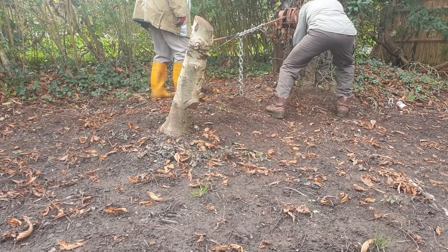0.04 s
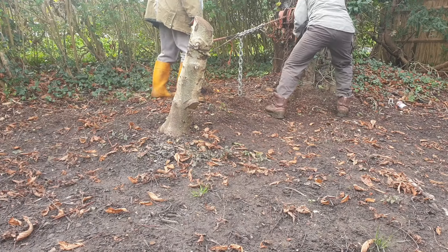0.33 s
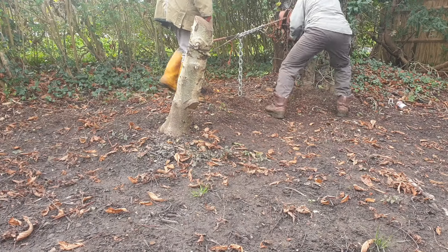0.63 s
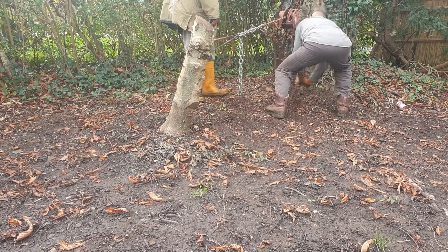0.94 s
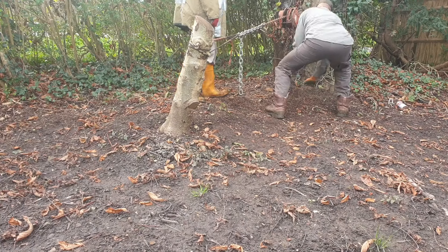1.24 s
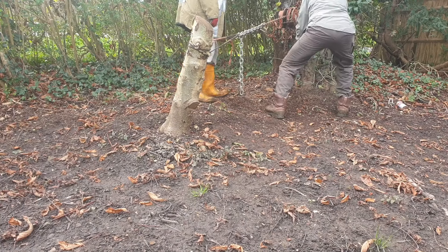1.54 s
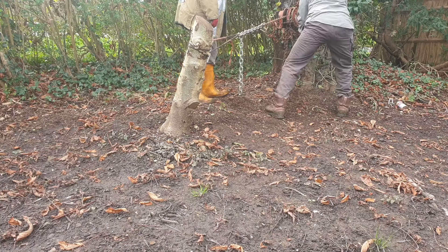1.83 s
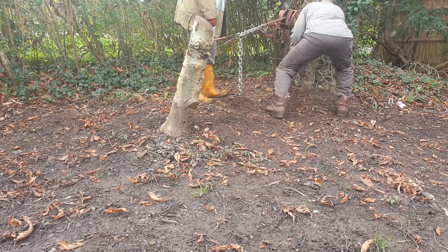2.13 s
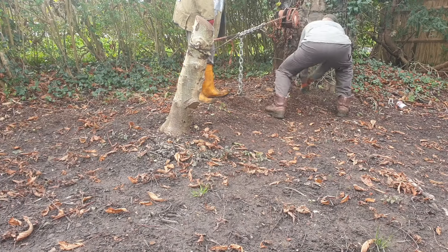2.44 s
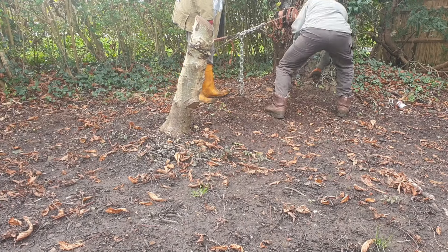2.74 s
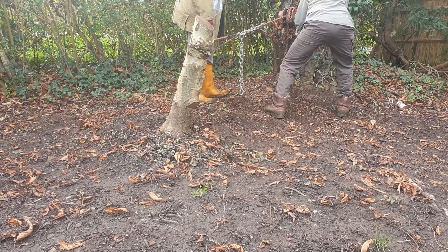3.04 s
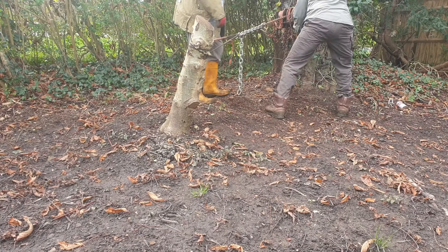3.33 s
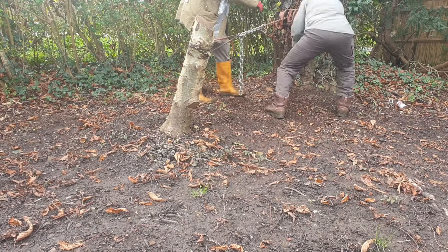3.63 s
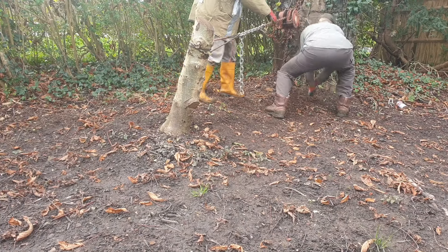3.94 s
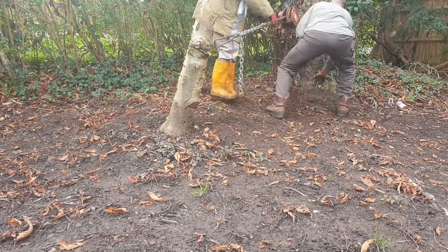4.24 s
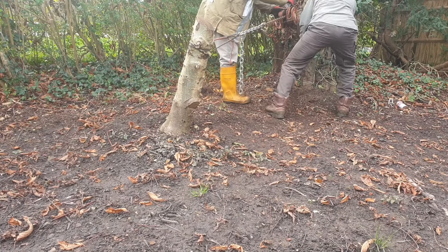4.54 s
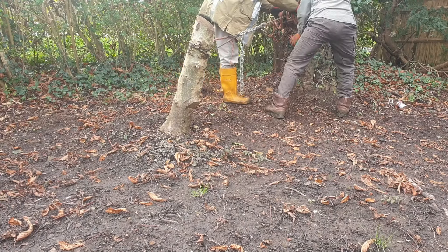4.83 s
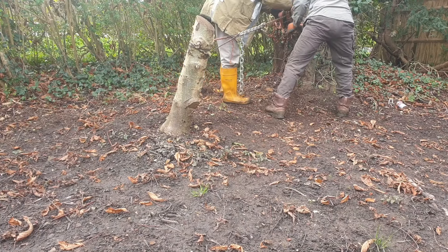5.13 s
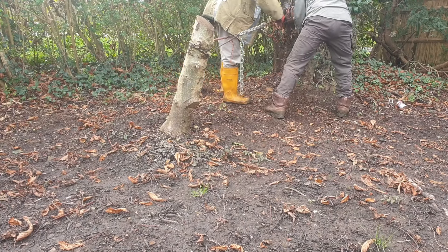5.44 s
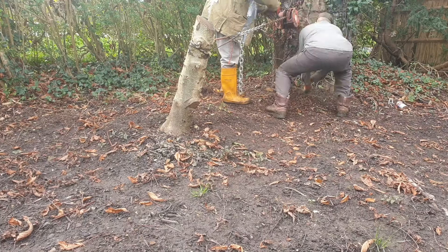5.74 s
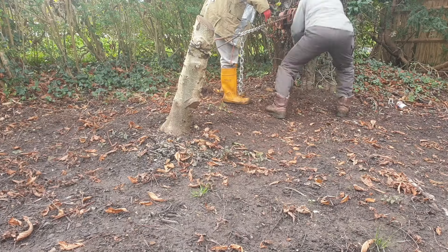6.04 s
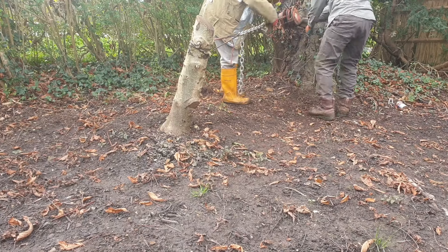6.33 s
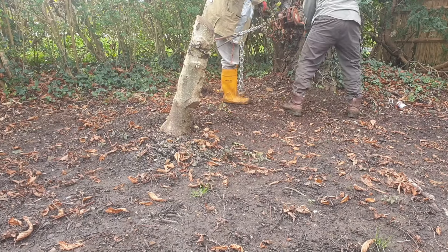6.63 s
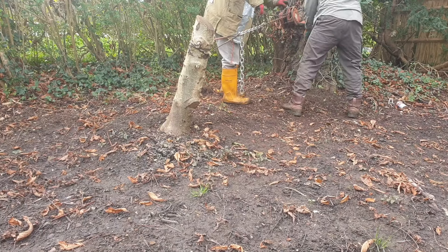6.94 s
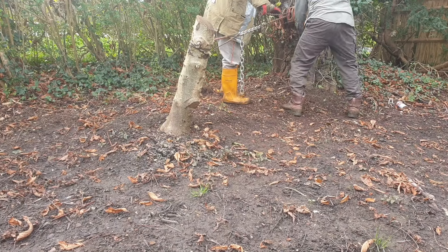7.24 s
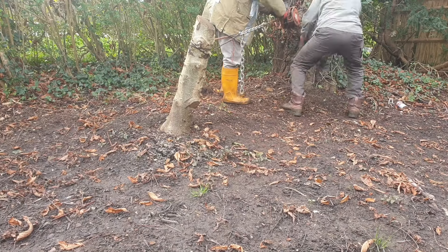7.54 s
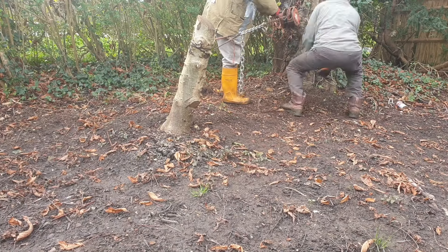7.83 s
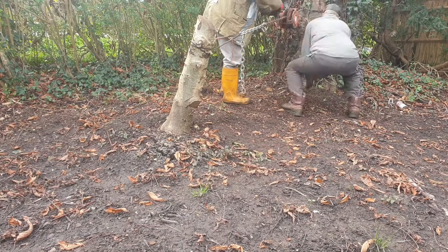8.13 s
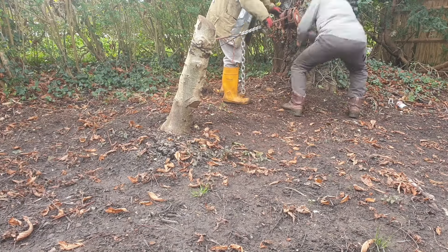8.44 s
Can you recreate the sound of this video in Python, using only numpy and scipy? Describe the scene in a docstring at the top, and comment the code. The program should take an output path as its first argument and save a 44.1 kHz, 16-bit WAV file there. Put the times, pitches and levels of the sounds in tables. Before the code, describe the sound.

A hand chain hoist is worked under load in a garden, a few metres from the microphone. Slack chain clinks and hisses, then three pulls each bring a fast ratchet clatter and chain rattle, with the steel ringing on. Six shorter, more damped tugs follow. Between pulls the housing knocks on its hook, cloth rubs and a heel thuds on soil. A small bird sings faintly over a low distant rumble.

```python
"""A chain block (a hand hoist) is hauled under load in a garden, a few metres away, over a low rumble.
First the slack chain hisses and clinks, the housing knocks on its hook and a small bird sings.
Then come three long pulls: the pawl (a small catch) clatters over the toothed wheel, the hand chain
rattles through the housing, and the steel rings on. From 5.4 s a hand steadies the block, so six short
tugs ring less. Between them cloth rubs, a heel thuds on the soil and the bird twitters."""
import sys
import numpy as np
from scipy import signal
from scipy.fft import rfft, irfft, next_fast_len
from scipy.io import wavfile
from scipy.ndimage import uniform_filter1d

SR = 44100
rng = np.random.default_rng(int(sys.argv[2]) if len(sys.argv) > 2 else 0)


def materialize(psi):
    """Save the field psi as 16-bit PCM at rate SR to the path in sys.argv[1].

    A 1-D psi becomes a single channel; in a 2-D psi each row is a channel.
    """
    bounded = np.clip(np.atleast_2d(psi).T, -1, 1)
    quanta = np.round(bounded * 32767).astype(np.int16)
    wavfile.write(sys.argv[1], SR, quanta)


N = 382347
TIME = np.arange(N) / SR
FFT_SIZE = next_fast_len(N + SR, real=True)
FREQS = np.maximum(np.fft.rfftfreq(FFT_SIZE, 1 / SR), 1)
HAND_ON_S = 5.4   # from here on a hand steadies the block


def from_db(db):
    """Turn decibels into a number to multiply by."""
    return 10 ** (np.asarray(db) / 20)


def rms_one(x):
    """Scale a signal so that its average power is 1."""
    return x / np.sqrt(np.mean(x ** 2) + 1e-20)


def over_hz(points):
    """Join (frequency, value) points into a curve over all frequencies."""
    hz, value = np.transpose(points)
    return np.interp(np.log(FREQS), np.log(hz), value)


def filtered(x, hz, kind):
    """Keep the "low" part, the "high" part or a "band" of a sound."""
    return signal.sosfilt(signal.butter(2, hz, kind, fs=SR, output="sos"), x)


def colour(x, tone):
    """Make some frequencies stronger and others weaker, following a tone table."""
    cepstrum = irfft(np.log(rms_one(from_db(over_hz(tone)))), FFT_SIZE)
    # minimum phase: the filter rings after a hit, never before it
    cepstrum[1:FFT_SIZE // 2] *= 2
    cepstrum[FFT_SIZE // 2 + 1:] = 0
    return irfft(rfft(x, FFT_SIZE) * np.exp(rfft(cepstrum)), FFT_SIZE)[..., :N]


def hiss():
    """Two unrelated noises: the direct and the scattered part of a sound."""
    return rng.standard_normal((2, N))


def grains(per_s, spread_db):
    """Tiny contacts of uneven size at random moments."""
    born = rng.random(N) < per_s / SR
    sizes = from_db(spread_db * np.minimum(rng.exponential(1, N), 4))
    return rms_one(hiss() * born * sizes)


def swell(middle, width):
    """A smooth rise and fall of height 1."""
    return np.exp(-((TIME - middle) / width) ** 2)


def fade(age, t60):
    """A level that falls by 60 dB every t60 seconds."""
    return np.exp(-np.log(1000) * age / t60)


def blows(hits, t60):
    """A level that leaps up at each (time, level) hit and dies away."""
    power = np.zeros(N)
    for s, db in hits:
        power[int(s * SR)] += from_db(db) ** 2
    dying = signal.lfilter([1], [1, -from_db(-120 / (t60 * SR))], power + 1e-18)
    return uniform_filter1d(np.sqrt(dying), int(.002 * SR))   # soften the start of each hit over 2 ms


def tail(x, t60):
    """The dense, dying ring that follows a sound."""
    response = rng.standard_normal((2, SR)) * fade(TIME[:SR], t60)
    return signal.fftconvolve(x, rms_one(response) / np.sqrt(SR), axes=1)[:, :N]


# how loud the distant rumble is, in two stretches: (time [s], level [dB])
RUMBLE_LEVELS = [
    [(0.1, -52), (0.31, -53), (5.23, -61), (6.0, -55.5)],
    [(6.25, -61.5), (7.05, -49.5), (8.57, -60), (8.6, -57)],
]
# tone of the rumble and of the air: (frequency [Hz], level [dB])
RUMBLE_TONE = [(12, -47), (20, -22), (43, 1.5), (81, 1), (135, -5.5), (192, -14.5), (357, -25.5),
               (406, -34), (558, -27), (654, -45.5), (900, -45.5), (1170, -70.5), (1980, -120)]
AIR_TONE = [(200, -3.5), (500, -1), (1000, -8), (2000, -9), (4000, -11.5), (6500, -7.5), (8500, -21.5),
            (12000, -18), (16000, -22.5)]
def outdoors():
    """A distant rumble slowly rises and falls under a faint hiss of air."""
    rumble_db = np.interp(TIME, *np.vstack(RUMBLE_LEVELS).T)
    rumble = from_db(rumble_db + 2) * colour(hiss(), RUMBLE_TONE)
    return rumble + from_db(-75) * colour(hiss(), AIR_TONE)


# swells of chain hiss and faint rustling: (middle time [s], width [s], level [dB])
HISS_SWELLS = [(0.02, 0.045, -61.5), (0.15, 0.18, -78), (1.32, 0.084, -66), (1.68, 0.16, -82),
               (2.75, .06, -65.5), (3.10, 0.14, -66), (3.23, 0.037, -56), (3.36, 0.049, -63),
               (4.22, 0.053, -71.5), (4.34, 0.047, -60), (4.64, 0.043, -67.5), (4.95, 0.1, -67),
               (5.569, 0.097, -64.5), (7.59, 0.013, -60), (8.30, 0.016, -56), (8.63, 0.012, -44)]
# tone of that hiss: (frequency [Hz], level [dB])
HISS_TONE = [(300, -7), (1500, -6), (4000, 2.5), (6500, 9.5), (8300, -1.5), (11500, 7.5), (14000, -2.5),
             (16000, -11.5)]
def chain_hiss():
    """The slack chain gives a bright, crackly hiss as it is jolted, with faint rustling between."""
    crackle = grains(per_s=500, spread_db=5) + hiss()
    level = sum(from_db(db) * swell(middle, width) for middle, width, db in HISS_SWELLS)
    return level * colour(crackle, HISS_TONE)


# the housing hitting its hook: (time [s], level [dB])
KNOCKS = [(0.28, -42.5), (1.346, -22.5), (3.191, -40), (4.033, -42.5), (4.298, -29.5), (4.364, -35.5),
          (4.462, -40), (4.553, -41), (4.763, -45.5), (4.883, -40), (4.914, -39), (4.959, -37),
          (5.146, -46), (5.787, -32.5), (7.511, -32), (7.845, -43.5), (7.974, -44.5), (8.44, -35),
          (8.648, -37)]
# tone of a knock: (frequency [Hz], level [dB])
HOOK_TONE = [(150, -20.5), (400, -17.5), (580, 8), (800, -6.5), (1150, -17.5), (1600, -12), (2400, -18.5),
             (5000, -21), (12000, -49)]
def hook():
    """The housing knocks on its hook: a dry clack, with a dull ring until the hand steadies it."""
    force = from_db(-2.5) * blows(KNOCKS, t60=.055) * hiss()
    ring = from_db(-5.5) * tail(force * (TIME < HAND_ON_S), t60=.22)
    clack = from_db(-7) * filtered(force, [700, 1800], "band")
    return colour(force + ring, HOOK_TONE) + clack


# soles and clothes scuffing, and at 1.355 s the dry crack of a hook knock: (middle time [s], half length [s],
# frequency [Hz], level [dB])
SCUFFS = [(0.303, 0.043, 1220, -53), (1.355, 0.024, 1460, -40), (2.101, 0.074, 1950, -65.5),
          (5.915, 0.035, 1620, -53.5), (5.911, 0.047, 3750, -52), (6.149, 0.021, 1604, -37.5),
          (6.147, 0.037, 4300, -30.5), (6.149, 0.018, 11200, -38), (6.218, 0.16, 3180, -63),
          (6.495, 0.024, 1210, -57.5), (6.781, 0.026, 690, -57.5), (6.827, 0.019, 4600, -63),
          (6.987, 0.038, 372, -59.5), (7.11, 0.036, 420, -60.5), (7.237, 0.033, 1300, -63),
          (7.352, 0.029, 384, -54), (7.56, .066, 990, -62), (7.908, 0.025, 1610, -59),
          (7.965, 0.043, 6000, -55.5), (7.985, 0.044, 1080, -59), (8.044, 0.15, 2150, -63),
          (8.622, 0.067, 1190, -55.5)]
def scuffs():
    """Short soft rubs, each a swell of friction noise, some low and some high."""
    out, friction = np.zeros((2, N)), grains(per_s=5700, spread_db=3.5)
    for middle, half_length, hz, db in SCUFFS:
        near = np.flatnonzero(abs(TIME - middle) < half_length)
        rub = filtered(friction[:, near], [hz * .59, hz * 1.34], "band")
        shape = np.cos(np.pi / 2 * (TIME[near] - middle) / half_length) ** 4
        out[:, near] += from_db(db) * shape * rms_one(rub)
    return out


# jolts of the slack chain: (time [s], clink level [dB], level of the jingle after it [dB])
CLINKS = [(0.307, -40, -63), (0.681, -32.5, -57), (0.6938, -24.5, -55), (1.058, -21.5, -55),
          (1.0875, -18.5, -44.5), (1.2722, -28.5, -55), (1.2913, -28.5, -48.5), (2.5548, -37, -69),
          (2.621, -32.5, -56), (2.7143, -36.5, -54.5), (3.004, -45, -61.5), (3.1919, -17.5, -47),
          (3.635, -44, -73), (4.088, -28, -58), (4.3013, -20.5, -42.5), (4.7393, -45, -61),
          (4.8883, -26, -47), (4.9861, -27.5, -45.5), (5.066, -44, -53.5), (6.269, -29.5, -63),
          (6.3528, -42.5, -72), (6.3812, -28, -62), (6.419, -47, -54), (7.5825, -29, -60),
          (7.669, -38.5, -60), (8.293, -34, -64), (8.554, -28.5, -45), (8.622, -26.5, -35.5)]
# a link grazes just before it hits, then bounces: (time from the hit [s], level change [dB])
BOUNCES = [(-.011, -14), (.038, -14)]
# tone of the links: (frequency [Hz], level [dB])
LINK_TONE = [(200, -24), (400, -10.5), (570, 6), (800, -9), (1100, -12.5), (1700, -3.5), (2300, -5),
             (3200, -1), (4500, 1.5), (6500, 0), (8300, -14), (12000, -16.5), (16000, -26)]
def slack_chain():
    """The hanging loop jingles softly as it moves, and single links clink."""
    motion = slack_motion()
    jingle = from_db(-1.5) * motion * grains(per_s=3600, spread_db=-.5)
    stray_samples = np.flatnonzero(rng.random(N) < 25 / SR)   # about 25 faint clinks a second
    strays = [(i / SR, 20 * np.log10(motion[i] + 1e-9) + 16) for i in stray_samples]
    jolts = [(s, db) for s, db, _ in CLINKS]
    bounces = [(s + lag, db + loss) for s, db in jolts for lag, loss in BOUNCES if s + lag < TIME[-1]]
    hits = jolts + bounces + strays
    clinks = from_db(-7.5) * blows(hits, t60=.03) * grains(per_s=43000, spread_db=2.5)
    force = jingle + clinks + from_db(-12.5) * pings(hits, low_hz=2600, high_hz=6830, t60=.04, count=5)
    ringing = force * np.where(TIME < HAND_ON_S, 1, from_db(-12))
    links = colour(force + from_db(-5) * tail(ringing, t60=.047), LINK_TONE)
    return links + from_db(-11.5) * steel_ring(ringing)


def slack_motion():
    """How much the loop moves: it settles after jolts, is gathered up for a pull, then swings back."""
    level = blows([(s, db) for s, _, db in CLINKS if s < HAND_ON_S], t60=.43)
    level += blows([(s, db) for s, _, db in CLINKS if s >= HAND_ON_S], t60=.11)
    for start, _, _, easing, *_, swing_db in PULLS:
        delay_s, width_s = (.25, .19) if easing < HAND_ON_S else (.14, .08)
        gather = from_db(-54) * swell(start, width=.013)
        swing = from_db(swing_db) * swell(easing + delay_s, width_s)
        level = np.hypot(level, gather + swing)
    return level


def pings(hits, low_hz, high_hz, t60, count):
    """Each hit catches a different link, which rings briefly at pitches of its own."""
    out, age = np.zeros((2, N + SR)), TIME[:SR // 10]
    for (s, db), draw in zip(hits, rng.random((len(hits), count, 4))):
        pitch, delay, direct, scattered = draw.T[:, :, None]
        hz = low_hz + pitch * (high_hz - low_hz)
        since = np.maximum(age - delay * .004, 0)
        tones = np.sin(2 * np.pi * hz * since) * fade(since, t60)
        strengths = 2 * np.hstack([direct, scattered]).T - 1
        at = int(s * SR)
        out[:, at:at + len(age)] += from_db(db) * strengths @ tones / np.sqrt(count)
    return out[:, :N]


# the notes that the steel wheel and housing ring at: (frequency [Hz], level [dB])
STEEL_NOTES = [(531, -4), (560, -7), (735, -9), (1560, -5), (1839, -4), (2079, -3), (2826, -4), (2869, -5),
               (2952, -2), (3073, -4), (3491, 0), (3738, 0), (4010, 2), (4405, -1), (4875, -2), (5540, -4),
               (5899, 1), (5956, 2), (5998, 0), (6212, 3), (6790, -6)]
def steel_ring(force):
    """Every contact sets the steel ringing like a small bell."""
    age = TIME[:SR]
    notes = sum(from_db(db) * np.sin(2 * np.pi * hz * age) for hz, db in STEEL_NOTES)
    response = rms_one(notes * fade(age, t60=.3)) / np.sqrt(SR)
    return signal.fftconvolve(force, response[None], axes=1)[:, :N]


# the bird's song: (time [s], length [s], first pitch [Hz], last pitch [Hz], level [dB])
BIRD_NOTES = [(0.33, 0.072, 5870, 5680, -58.5), (0.416, 0.033, 5270, 4780, -55),
              (0.59, 0.043, 6150, 5780, -49.5), (4.697, 0.21, 8300, 7870, -65),
              (5.02, 0.061, 8100, 7360, -61), (5.13, 0.11, 6840, 6400, -61),
              (5.221, 0.081, 5900, 5460, -63.5), (5.305, .08, 5350, 4780, -61),
              (5.457, 0.035, 7020, 7240, -53.5), (5.972, .032, 3480, 3350, -67),
              (6.315, .035, 7200, 7140, -58), (6.533, 0.028, 5650, 6060, -63.5),
              (6.568, 0.058, 3270, 4680, -60), (6.754, 0.032, 5300, 6220, -53.5),
              (6.757, 0.075, 4960, 4010, -62.5), (6.9, 0.05, 7700, 8440, -53),
              (6.898, 0.095, 7830, 3820, -53), (7.067, 0.028, 4200, 5800, -56.5),
              (7.127, 0.079, 7830, 6970, -55.5), (7.264, 0.13, 2950, 3720, -57.5),
              (7.816, 0.022, 5260, 5230, -42), (7.879, .035, 7650, 6850, -55),
              (7.969, 0.03, 6530, 8340, -51), (8.351, 0.04, 6000, 7970, -57.5)]
def bird():
    """Thin sliding whistles, two-voiced at first and twittering later; the hedge scatters them."""
    song = np.zeros(N)
    pitch_flutter, level_flutter = rms_one(filtered(hiss(), 260, "low"))
    for s, length, first, last, db in BIRD_NOTES:
        note = slice(int(s * SR), int((s + length) * SR))
        along = np.linspace(0, 1, note.stop - note.start)
        flutter_hz = 387 if 6.5 < s < 7.25 else 65.35   # a wide flutter makes a twitter
        hz = first + (last - first) * along + flutter_hz * pitch_flutter[note]
        phase = 2 * np.pi * np.cumsum(hz) / SR
        lower_voice = from_db(-5) * np.sin(.78 * phase) if s < 5.4 else 0
        level = from_db(db + 1.7 * level_flutter[note]) * np.sin(np.pi * along)
        song[note] += level * (np.sin(phase) + lower_voice)
    song = np.stack([song, song])
    return from_db(-3.5) * song + from_db(-9.5) * tail(song, t60=.16)


# pulls on the hand chain: (start time [s], full-speed time [s], hardest time [s], easing time [s],
# stop time [s], rattle level [dB], pawl level [dB], back-swing level [dB])
PULLS = [(0.706, 0.760, 0.880, 0.985, 1.07, -25, -6.5, -57),
         (2.131, 2.178, 2.236, 2.35, 2.43, -22, -3.5, -59),
         (3.684, 3.742, 3.892, 3.925, 4.0, -21, -4.5, -63),
         (5.668, 5.70, 5.728, 5.742, 5.79, -24, -11, -70),
         (6.04, 6.066, 6.096, 6.11, 6.15, -22.5, -12, -67),
         (7.38, 7.392, 7.424, 7.453, 7.48, -23.5, -4.5, -62),
         (7.727, 7.745, 7.768, 7.785, 7.83, -22.5, -8, -63),
         (8.097, 8.114, 8.135, 8.158, 8.182, -22.5, -5, -66),
         (8.447, 8.464, 8.496, 8.503, 8.55, -22, -6.5, -54)]
def chain_run(start_db, stop_db):
    """How loud the hand chain is as it speeds up, runs and coasts to rest in each pull."""
    level = np.zeros(N)
    for start, full, _, easing, stop, rattle_db, *_ in PULLS:
        shape_db = np.interp(TIME, [start, full, easing, stop], [start_db, 0, 0, stop_db])
        take_up = np.clip((TIME - start) / .016, 0, 1)   # the links tighten one after another
        level += from_db(rattle_db + shape_db) * take_up * (TIME < stop)
    return level


def tumbling_links(level, strikes_per_s=220):
    """Links scrape through the guide and strike it at random, harder as the chain runs faster."""
    when, strength = rng.random((int(strikes_per_s * N / SR), 2)).T
    s = when * TIME[-1]
    force = 2 * strength * np.interp(s, TIME, level)
    strikes = np.column_stack([s[force > 0], 20 * np.log10(force[force > 0]) + 2])
    scrape = level * grains(per_s=16000, spread_db=1)
    return scrape + pings(strikes, low_hz=1300, high_hz=6988, t60=.024, count=3)


def pawl(teeth_per_s=63, jitter_s=.0013, uneven_db=2):
    """The pawl drops with a click after each tooth of the wheel, louder as the effort builds."""
    teeth, drops = np.arange(-16, 16), []
    for start, full, hardest, easing, _, _, pawl_db, _ in PULLS:
        jitter, uneven = rng.standard_normal((2, len(teeth)))
        s = hardest + teeth / teeth_per_s + jitter_s * jitter
        effort_db = np.interp(s, [start, full, hardest, easing], [-16, -6, 0, -8])
        db = pawl_db + effort_db + uneven_db * uneven
        hauling = (s > start) & (s < easing)
        drops.extend(zip(s[hauling], db[hauling]))
    clicks = from_db(-11) * blows(drops, t60=.045) * grains(per_s=16000, spread_db=2.5)
    return clicks + from_db(-6) * pings(drops, low_hz=1302, high_hz=6995, t60=.04, count=6)


# tone of the housing, hanging free and held by hand: (frequency [Hz], level [dB])
FREE_TONE = [(100, -25.5), (370, -17.5), (510, 4.5), (740, -3.5), (900, -6.5), (1170, -9.5), (1550, -1),
             (2050, -3.5), (2350, -9.5), (3000, -1), (4000, -1.5), (6400, -1.5), (8300, -13.5),
             (11500, -11), (16000, -22.5)]
HELD_TONE = [(88, -59.5), (150, -18.5), (376, -23), (534, -4.5), (716, -4.5), (1060, -12), (1600, -2.5),
             (2270, -6.5), (3350, -6), (3620, -1), (5050, -7), (6140, -2.5), (8400, -18.5), (12900, -16.5),
             (16000, -31)]
def chain_block():
    """Pawl and links shake the housing; it rings on while it hangs free and is damped once held."""
    force = pawl() + from_db(-2) * tumbling_links(chain_run(start_db=-11.5, stop_db=-37.5))
    free_force, held_force = force * (TIME < HAND_ON_S), force * (TIME >= HAND_ON_S)
    free = from_db(.5) * colour(free_force + from_db(-8) * tail(free_force, t60=.41), FREE_TONE)
    held = from_db(1) * colour(held_force + from_db(-25) * tail(held_force, t60=.18), HELD_TONE)
    return free + held + from_db(-11) * steel_ring(free_force)


def clothing():
    """Cloth rubs unevenly as the hauler straightens up after each short tug."""
    rub = filtered(grains(per_s=830, spread_db=4.5), [446, 1900], "band")
    rising = sum(swell(easing + .12, width=.067) for _, _, _, easing, *_ in PULLS if easing > HAND_ON_S)
    return from_db(-70.5) * rising * rms_one(rub)


# a boot set down: (time [s], level [dB])
STEPS = [(6.134, -22.5), (6.149, -24.5)]
# tone of the soil: (frequency [Hz], level [dB])
SOIL_TONE = [(25, -4), (60, -2.5), (150, 3.5), (220, -7), (320, -10.5), (600, -11), (1500, -13),
             (6000, -35)]
def heel():
    """A heel lands on the soil with a dull thud."""
    return colour(from_db(-1.5) * blows(STEPS, t60=.07) * hiss(), SOIL_TONE)


# how alike left and right are: (frequency [Hz], likeness [0 to 1])
LIKENESS = [(60, .98), (600, .96), (1400, .78), (3000, .68), (6500, .65), (12000, .3)]
# how much louder the left is: (frequency [Hz], left minus right [dB])
BALANCE = [(60, 7.1), (300, 2.3), (520, 8.5), (800, 4), (1400, 4.5), (2100, 1.8), (3000, 1), (6000, 5.9),
           (12000, 9.5)]
def stereo(pair):
    """Spread the sound to both sides: alike in the bass, the left louder and slightly later."""
    direct, scattered = rfft(pair, FFT_SIZE)
    alike = over_hz(LIKENESS)
    mid, side = direct * np.sqrt((1 + alike) / 2), scattered * np.sqrt((1 - alike) / 2)
    lean = from_db(over_hz(BALANCE) / 2)
    left = (mid + side) * lean * np.exp(-2j * np.pi * FREQS * 2 / SR)   # two samples late
    right = (mid - side) / lean
    return irfft(np.stack([left, right]), FFT_SIZE)[:, :N]


def scene():
    """Add up all the sounds in the garden."""
    return stereo(outdoors() + chain_hiss() + hook() + scuffs() + slack_chain() + bird()
                  + chain_block() + clothing() + heel())


def record(dry):
    """The microphone loses the deepest bass, and the highest treble is cut steeply."""
    treble_cut = signal.ellip(12, .1, 80, 16200, fs=SR, output="sos")
    return signal.sosfilt(treble_cut, filtered(dry, 32.2, "high"))


dry = scene()
out = record(dry)
materialize(out)
```